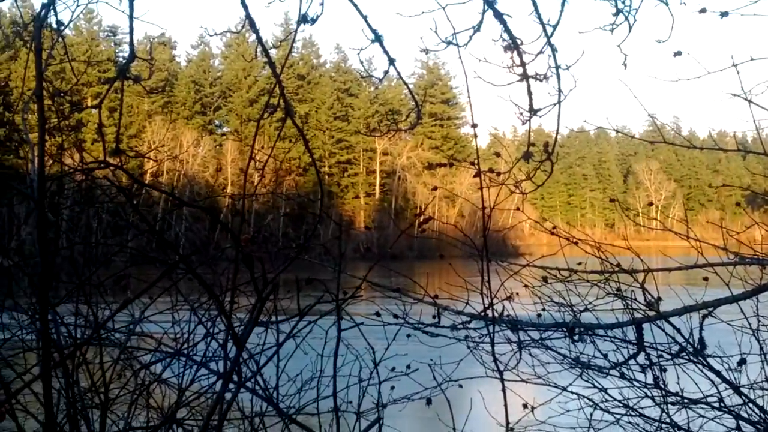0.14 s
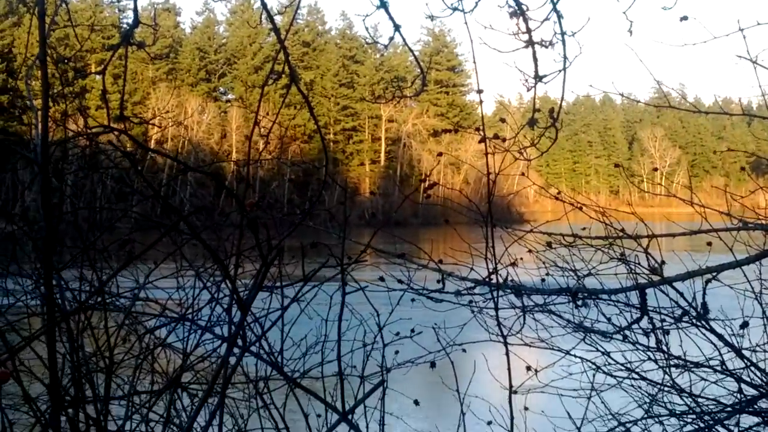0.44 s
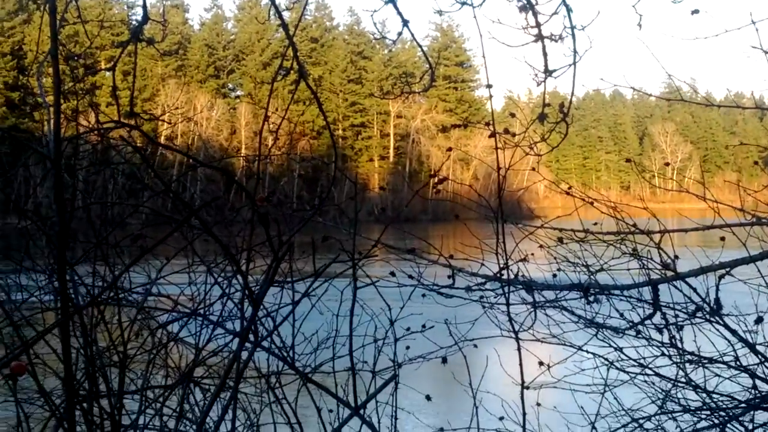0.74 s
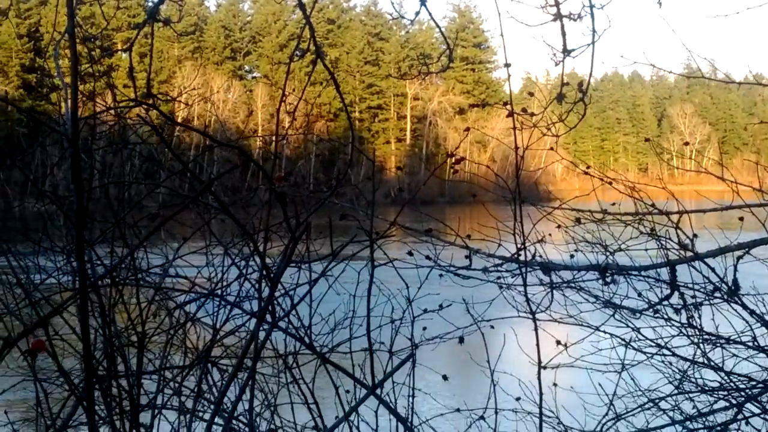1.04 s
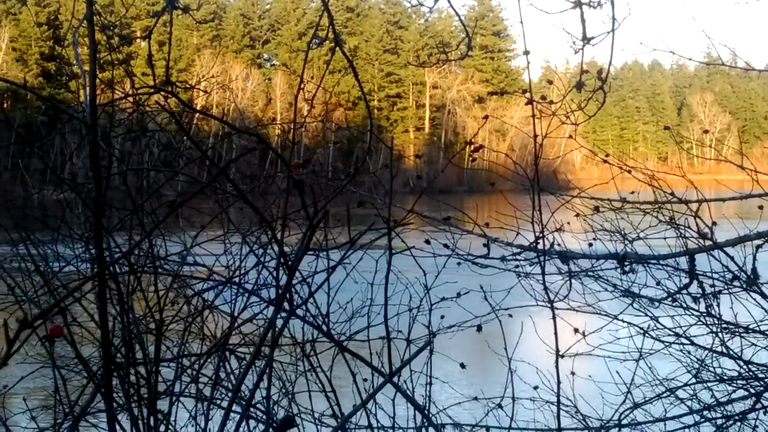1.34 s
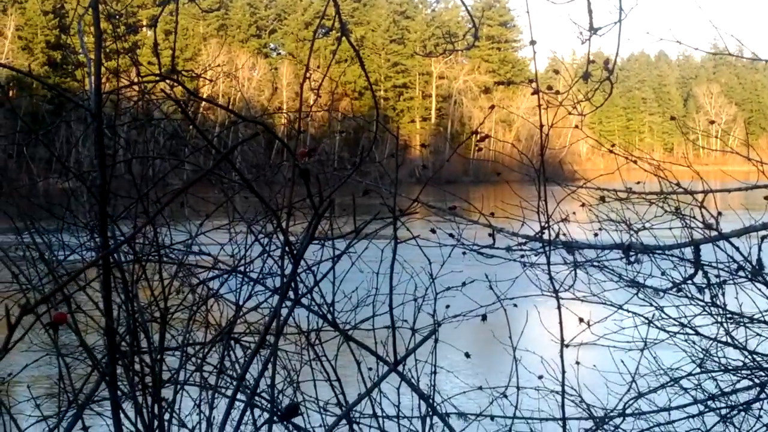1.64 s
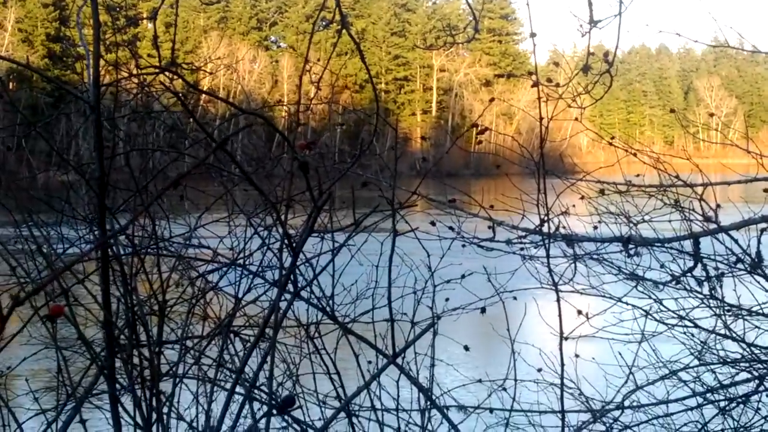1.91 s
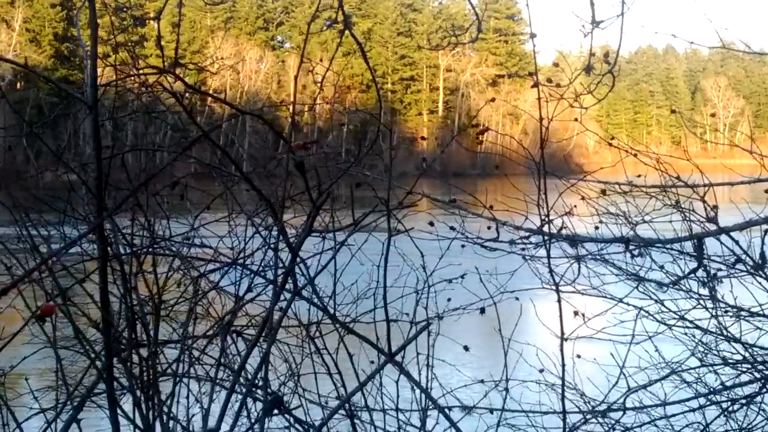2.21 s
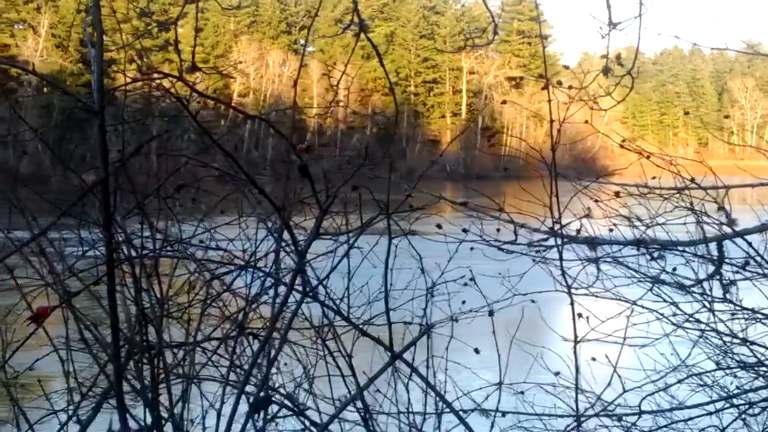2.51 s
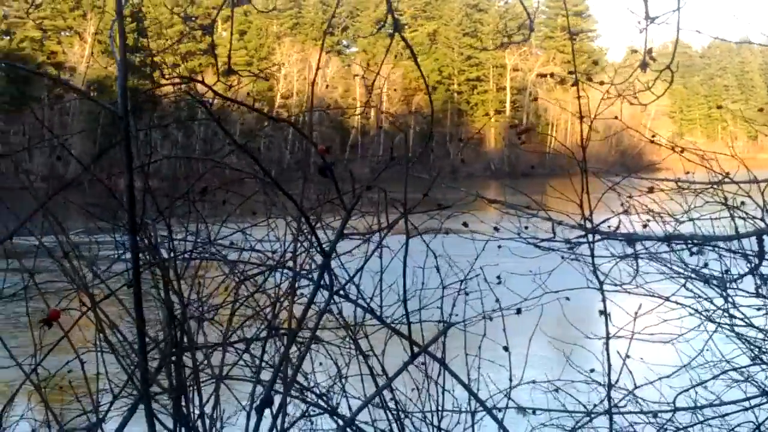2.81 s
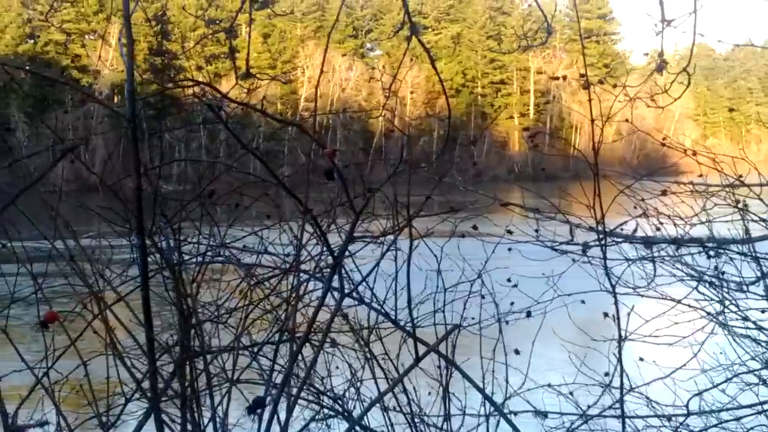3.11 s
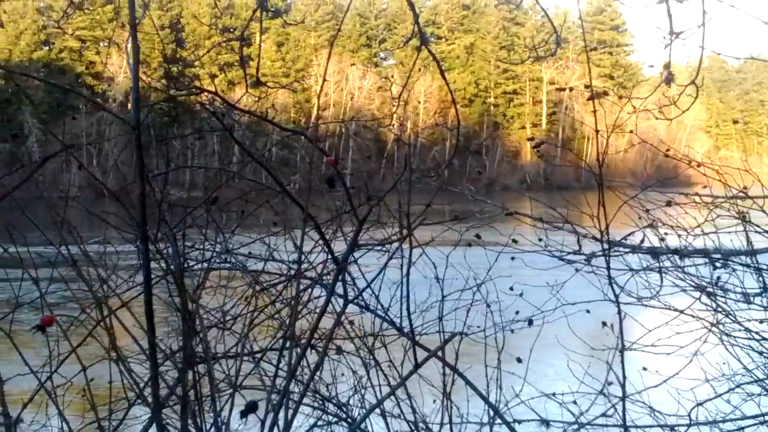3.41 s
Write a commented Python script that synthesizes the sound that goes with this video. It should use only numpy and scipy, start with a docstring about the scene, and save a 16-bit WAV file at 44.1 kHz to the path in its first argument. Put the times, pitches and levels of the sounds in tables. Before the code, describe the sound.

From the near bank, outdoors, thrown stones hit lake ice with sharp pew-like zips and knocks, then bounce away in ever closer, duller chirps, ending in a faint steady twitter over quiet rumble and hiss.

```python
"""On a frozen lake, rocks skip away across the ice. Each touch sends out a dispersive bending wave, treble first,
synthesized as a falling chirp that ends about when the airborne knock arrives. Farther touches give longer, duller
and closer chirps, until the rocks slide in a twitter. Filtered noise makes knocks, grit, ticks and a narrow ring;
the bank and wooded shore echo by convolution. A faint far rumble, a wavering hum and a thin hiss lie beneath."""
import sys
import numpy as np
from scipy import signal
from scipy.fft import rfft, irfft
from scipy.io import wavfile

SR = 44100
rng = np.random.default_rng(int(sys.argv[2]) if len(sys.argv) > 2 else 0)


def to_wav(sig):
    """Store sig (one row per channel, or 1-D mono) as 16-bit WAV at the path in sys.argv[1].

    Samples outside -1..1 are clipped; the rate is SR.
    """
    pcm = np.clip(np.atleast_2d(sig), -1, 1) * 32767
    pcm = np.round(pcm).astype(np.int16)
    wavfile.write(sys.argv[1], SR, pcm.T)  # frames by channels


N = 156555
T = np.arange(N) / SR  # time [s]

# Touches on the ice: (start [s], length [s], final pitch [Hz], level before ice colour [dB],
# early treble relative to the end [dB])
TOUCHES = [(0.2083, 0.023, 2376, -22, -1), (0.2987, 0.022, 2480, -23, -2.5), (0.548, 0.024, 2449, -27, -1),
           (0.6160, 0.028, 2293, -20.5, -6.5), (0.7815, 0.027, 2350, -18.5, -3),
           (0.93, 0.028, 2312, -28.5, -12), (0.993, 0.029, 2300, -34, -7), (1.0020, 0.028, 2290, -32, -3.5),
           (1.0452, 0.031, 2172, -25, -12), (1.061, 0.034, 2174, -32, -8.5), (1.1643, 0.03, 2273, -26, -10),
           (1.22, 0.034, 2150, -33, -10), (1.2627, 0.030, 2264, -28.5, -11.5),
           (1.3786, 0.035, 2112, -29, -2.5), (1.3810, 0.035, 2123, -35, -1),
           (1.4236, 0.031, 2260, -37.5, -6), (1.4322, 0.030, 2240, -28.5, -4),
           (1.541, 0.035, 2116, -30.5, -5), (1.5804, 0.032, 2220, -26.5, -7),
           (1.6164, 0.034, 2100, -36, -4), (1.698, 0.031, 2214, -27.5, -6), (1.7589, 0.04, 2122, -25, -5),
           (1.7778, 0.033, 2150, -28, -8), (1.9197, 0.036, 2104, -30.5, -6.5),
           (1.932, 0.039, 2084, -34.5, -3), (1.983, 0.032, 2140, -37.5, -8.5),
           (2.015, 0.033, 2190, -37, -10.5), (2.057, 0.036, 2107, -45, -13.5),
           (2.11, 0.036, 2093, -39.5, -11.5), (2.146, 0.037, 2090, -32.5, -11.5),
           (2.1894, 0.038, 2060, -40.5, -15), (2.241, 0.031, 2190, -42.5, -17),
           (2.278, 0.036, 2106, -42, -13.5), (2.292, 0.042, 2043, -35.5, -13.5),
           (2.33, 0.035, 2060, -43, -18), (2.4140, 0.035, 2170, -34.5, -10),
           (2.4466, 0.039, 2040, -35, -12), (2.4665, 0.046, 2050, -39, -12),
           (2.5594, 0.042, 1982, -39, -10), (2.569, 0.037, 2137, -39, -10),
           (2.5904, 0.039, 2130, -39.5, -13), (2.604, 0.039, 2140, -38.5, -14),
           (2.6286, 0.043, 2020, -37, -11), (2.669, 0.042, 2015, -40.5, -14),
           (2.706, 0.037, 2060, -44, -12), (2.72, 0.043, 2010, -38, -6), (2.7828, 0.047, 1955, -39, -8),
           (2.8014, 0.045, 2024, -36.5, -16), (2.861, 0.04, 2027, -40, -8),
           (2.917, 0.043, 2030, -41.5, -15), (2.932, 0.043, 2022, -34, -8.5),
           (2.9674, 0.039, 2120, -38, -8), (2.978, 0.043, 2000, -35.5, -11),
           (3.0127, 0.038, 2080, -37, -14), (3.0234, 0.04, 2007, -43.5, -16),
           (3.059, 0.038, 2130, -40.5, -11), (3.0713, 0.047, 1996, -40, -15),
           (3.1198, 0.045, 2000, -39.5, -10), (3.1625, 0.04, 2130, -40, -16),
           (3.206, 0.043, 2000, -37.5, -15), (3.2176, 0.044, 2000, -38.5, -8.5),
           (3.2393, 0.041, 1995, -40, -17), (3.286, 0.045, 1984, -34, -8.5),
           (3.317, 0.045, 2035, -42.5, -12), (3.404, 0.037, 2000, -43.5, -11.5),
           (3.4358, 0.044, 1984, -37, -13.5), (3.522, 0.042, 2050, -38.5, -16)]
# Short, high zips around the nearest touches: (start [s], length [s], final pitch [Hz], level [dB])
HIGH_ZIPS = [(0.200, 0.0054, 5200, -44), (0.259, 0.007, 3680, -32), (0.29, 0.0069, 4960, -38),
             (0.2965, 0.0078, 4500, -21.5), (0.502, 0.0096, 3730, -45.5), (0.540, 0.005, 5150, -50),
             (0.548, 0.0078, 4210, -29.5), (.607, 0.0047, 5300, -45)]


def skips():
    """Dispersion: each clear bounce spreads into a falling chirp, with brief higher zips beside the nearest."""
    out = np.zeros(N)
    for start, length, end_hz, level_db, treble_db in TOUCHES:
        add(out, start, chirp(length, end_hz, level_db, treble_db))
    for start, length, end_hz, level_db in HIGH_ZIPS:
        wave, _, progress = bending_wave(length, end_hz)
        swell = np.sin(np.pi / 2 * progress) ** 2
        add(out, start, from_db(level_db) * wave * swell)
    return out


SLIDE_PER_S, SLIDE_LENGTH_S = 62, .042
SLIDE_END_HZ, SLIDE_PITCH_SPREAD = 2020, 0.02093  # the spread is a fraction of the pitch
SLIDE_TREBLE_DB, SLIDE_SPREAD_DB = -8, 1.5
# Light touches while sliding, levels before ice colour: (time [s], level [dB])
SLIDE_LEVELS = [(1.9, -51.5), (2.1, -52), (2.329, -49.5), (2.53, -51), (2.6, -46.5), (3.0, -49),
                (3.3, -49.5), (3.55, -57.5)]


def slide():
    """Repeated impact: far out the rocks rattle along in many light touches at jittered intervals."""
    out = np.zeros(N)
    times, levels = np.transpose(SLIDE_LEVELS)
    for beat in np.arange(times[0], T[-1], 1 / SLIDE_PER_S):
        start = beat + rng.uniform(-0.6, 0.6) / SLIDE_PER_S
        level_db = np.interp(start, times, levels) + SLIDE_SPREAD_DB * rng.standard_normal()
        end_hz = SLIDE_END_HZ * (1 + SLIDE_PITCH_SPREAD * rng.standard_normal())
        add(out, start, chirp(SLIDE_LENGTH_S, end_hz, level_db, SLIDE_TREBLE_DB))
    return out


NEAR_LENGTH_S, NEAR_TOP_HZ, TOP_FALL = 0.03, 5980, 0.54  # longer paths lose their top
SIDE_PATH_DB, SIDE_PATH_S = -23, 0.008  # level at the near length; longest extra delay
SIDE_PATH_DB_PER_S = 350  # side paths gain on the direct wave as the chirps lengthen
ONSET_FADE_S = 0.003  # time constant: the earliest, highest cycles swell in softly
# Response of the ice along the sweep: (frequency [Hz], gain [dB])
ICE_RESPONSE = [(1500, -2.5), (2100, -3), (2450, -2.5), (2680, -2), (2860, -7.5), (3050, -1.5), (3400, -1),
                (4200, -7.5), (5200, -15), (6500, -18), (9000, -34)]


def chirp(length, end_hz, level_db, treble_db, count=4):
    """Absorption and multipath: a longer path dulls the chirp's start and strengthens its delayed copies."""
    wave, hz, progress = bending_wave(length, end_hz)
    early_db = treble_db * np.interp(progress, [.3, .7], [1, 0])
    wave = wave * from_db(level_db + at_hz(ICE_RESPONSE, hz) + early_db)
    top_hz = NEAR_TOP_HZ * (length / NEAR_LENGTH_S) ** -TOP_FALL
    wave = wave / np.sqrt(1 + (hz / top_hz) ** 20)
    wave = wave * (1 - np.exp(-progress * length / ONSET_FADE_S))
    span = int(SIDE_PATH_S * SR)
    out = np.pad(wave, (0, span))
    side_gain = from_db(SIDE_PATH_DB + SIDE_PATH_DB_PER_S * (length - NEAR_LENGTH_S))
    for lag in (rng.random(count) * span).astype(int):
        out[lag:lag + len(wave)] += side_gain * wave
    return out


SWEEP_POWER, TOP_HZ = .39, 8450  # fall of pitch with time; 6 dB treble roll-off point
DROP_S, DROP_FADE_S = 0.0013, 0.00044  # time constants: the end sags into a short low click
RIPPLE_DB, RIPPLE_S = 1.5, 0.0022  # uneven ice makes each chirp flutter
ONSET_RIPPLE_DB = 2  # added flutter at its weak start


def bending_wave(length, end_hz):
    """Dispersion: high frequencies travel fastest, so pitch falls as a power of time. Also gives pitch, progress 0-1."""
    t = T[1:int((length + .01) * SR)]
    progress = np.minimum(t / length, 1)
    after = np.maximum(t - length, 0)
    hz = np.minimum(end_hz * progress ** -SWEEP_POWER, 2 * TOP_HZ) * np.exp(-after / DROP_S)
    flutter_db = (RIPPLE_DB + ONSET_RIPPLE_DB * (1 - progress)) * wander(t, RIPPLE_S)
    gain = from_db(flutter_db) * np.exp(-after / DROP_FADE_S) / (1 + (hz / TOP_HZ) ** 6)
    return np.sqrt(2) * gain * np.sin(2 * np.pi * np.cumsum(hz) / SR), hz, progress


CLICK_T60_S, THUD_T60_S, SCATTER_T60_S = 0.01, 0.027, 0.41
GRAINS_PER_S = 3000  # crackle of grit and of sound scattered by twigs
# Airborne knocks of stone on ice: (time [s], click level [dB], low thud level [dB], scattered tail level [dB])
AIR_KNOCKS = [(0.2303, -28, -30, -38), (0.3207, -25, -26, -37.5), (0.5726, -32.5, -36, -48.5),
              (0.6427, -20.5, -38, -38)]
# Spectra of click, thud and scattered tail: (frequency [Hz], relative level [dB])
CLICK_SPECTRUM = [(500, -0.5), (1500, -1), (3000, 6.5), (5000, -19), (8000, -2.5), (12000, -9), (16000, -6)]
THUD_SPECTRUM = [(60, -19), (250, -3), (500, -8), (900, 4.5), (1400, -8.5), (3000, -33)]
SCATTER_SPECTRUM = [(300, -0.5), (1500, -7), (2600, 7.5), (4800, -3), (7000, -12.5), (11000, -8.5),
                    (16000, -14)]


def knocks():
    """Airborne radiation and scattering: the nearest touches click and thud, then crackle back from the bank."""
    times, click_db, thud_db, tail_db = np.transpose(AIR_KNOCKS)
    click = bursts(times, click_db, noise(CLICK_SPECTRUM), CLICK_T60_S)
    thud = bursts(times, thud_db, noise(THUD_SPECTRUM), THUD_T60_S)
    tail = bursts(times, tail_db, grains(SCATTER_SPECTRUM, GRAINS_PER_S), SCATTER_T60_S)
    return click + thud + tail


RING_T60_S = 0.1
# Rings of the ice sheet after the first bounce: (time [s], level [dB])
RING_TIMES = [(.232, -42), (.270, -37)]
# Narrow band of the ring: (frequency [Hz], relative level [dB])
RING_SPECTRUM = [(2000, -50), (2380, -11), (2480, 5), (2580, -15), (3000, -50)]


def ringing():
    """Resonance: the ice sheet rings in a narrow band that decays exponentially."""
    return bursts(*np.transpose(RING_TIMES), noise(RING_SPECTRUM), RING_T60_S)


SPRAY_T60_S = 0.45
# Gritty spray as the first stones land: (time [s], level [dB])
SPRAY_TIMES = [(.201, -46), (0.296, -41.5), (0.542, -48), (.606, -51)]
# Colour of the spray: (frequency [Hz], relative level [dB])
SPRAY_SPECTRUM = [(1800, -7.5), (3000, -7), (5300, 2), (8000, -8.5), (12000, -15), (16000, -14)]


def spray():
    """Granular noise: dense random clicks of grit, dying away after each landing."""
    return bursts(*np.transpose(SPRAY_TIMES), grains(SPRAY_SPECTRUM, GRAINS_PER_S), SPRAY_T60_S)


TICK_T60_S = 0.022
# Small dry ticks: (time [s], level [dB])
TICK_TIMES = [(0.12, -33), (0.123, -46), (.127, -50), (.266, -41), (.768, -47), (1.354, -50), (2.347, -48),
              (3.347, -53), (3.354, -49)]
# Colour of the ticks: (frequency [Hz], relative level [dB])
TICK_SPECTRUM = [(1500, -16), (4000, -19), (9000, -16), (13000, -6.5), (16000, -1)]


def ticks():
    """Transient excitation: short bursts of bright noise."""
    return bursts(*np.transpose(TICK_TIMES), noise(TICK_SPECTRUM), TICK_T60_S)


BANK_DB, BANK_T60_S, BANK_ECHOES_PER_S = -12, 0.33, 450
SHORE_DB, SHORE_T60_S = -15, 0.81
# Colour of both echoes: (frequency [Hz], relative level [dB])
ECHO_SPECTRUM = [(500, 13), (1400, 8.5), (1900, 5.5), (2500, -1), (3300, 3.5), (4600, 8), (7000, 3.5),
                 (9000, -8), (16000, -24)]


def echoes(x):
    """Reverberation: convolution with separate near-bank reflections and a long wash from the wooded shore."""
    bank = grains(ECHO_SPECTRUM, BANK_ECHOES_PER_S)
    shore = noise(ECHO_SPECTRUM)
    response = 0
    for level_db, t60, texture in ((BANK_DB, BANK_T60_S, bank), (SHORE_DB, SHORE_T60_S, shore)):
        tail = texture * from_db(-60 * T / t60)
        response = response + from_db(level_db) * tail / np.sqrt(np.sum(tail ** 2))  # unit energy, then level
    return signal.fftconvolve(x, response)[:N]


RUMBLE_DB, RUMBLE_EDGE_HZ = -49.5, 1420
# Colour of the rumble before its low-pass: (frequency [Hz], relative level [dB])
RUMBLE_SPECTRUM = [(15, -56), (25, -3), (64, 1), (97, -0.5), (119, -18.5), (132, -2.5), (156, -11.5),
                   (189, -11), (266, -6), (408, -11.5), (546, -10.5), (882, -2.5), (1500, -15.5),
                   (1950, -9), (3300, -120)]


def rumble():
    """Low-pass filtering: steady coloured noise keeps only its low part, a faint far rumble."""
    low_pass = signal.butter(6, RUMBLE_EDGE_HZ, fs=SR, output="sos")
    return from_db(RUMBLE_DB) * rms_one(signal.sosfilt(low_pass, noise(RUMBLE_SPECTRUM)))


HUM_HZ, HUM_WAVER_HZ = 122.1, 2.99
HUM_DB, HUM_WAVER_DB, HUM_FADE_DB_PER_S = -56, 2.1, 1.97  # level at the start, its waver and its fade


def hum():
    """Frequency and amplitude modulation: a low sine wavers in pitch and level as it slowly fades."""
    hz = HUM_HZ + HUM_WAVER_HZ * wander(T, .07)
    tone = np.sqrt(2) * np.sin(2 * np.pi * np.cumsum(hz) / SR)
    return from_db(HUM_DB - HUM_FADE_DB_PER_S * T + HUM_WAVER_DB * wander(T, .09)) * tone


HISS_DB = -59
# Colour of the hiss: (frequency [Hz], relative level [dB])
HISS_SPECTRUM = [(1200, 6), (2000, -4.5), (4000, 0.5), (7000, -4), (10000, -7.5), (12000, -2), (13000, 0),
                 (13550, 12.5), (14100, -2), (16000, 3)]


def hiss():
    """Stationary noise: a thin, steady coloured hiss."""
    return from_db(HISS_DB) * noise(HISS_SPECTRUM)


def bursts(times, levels_db, texture, t60):
    """Exponential decay: a texture starts sharply at each time and falls 60 dB per t60, for up to a second."""
    envelope = np.zeros(N)
    for start, level_db in zip(times, levels_db):
        add(envelope, start, from_db(level_db - 60 * T[:SR] / t60))
    return envelope * texture


GRAIN_SPREAD_DB = 2.5


def grains(spectrum, per_s):
    """Shot noise: random clicks of uneven size and either sign, coloured, rms 1."""
    present = rng.random(N) < per_s / SR
    sign = rng.choice([-1, 1], N)
    size = from_db(GRAIN_SPREAD_DB * np.minimum(rng.exponential(1, N), 3))
    return coloured(present * sign * size, spectrum)


def noise(spectrum):
    """Filtered Gaussian noise: coloured, rms 1."""
    return coloured(rng.standard_normal(N), spectrum)


def coloured(x, spectrum):
    """Linear filtering: multiply the Fourier spectrum by a colour, then set rms 1."""
    gain = from_db(at_hz(spectrum, np.fft.rfftfreq(N, 1 / SR)))
    return rms_one(irfft(rfft(x) * gain, N))


def at_hz(points, hz):
    """Interpolation: read a spectrum in dB on a log-frequency axis."""
    f, db = np.transpose(points)
    return np.interp(np.log(hz + 1e-3), np.log(f), db)


def wander(t, step_s, count=64):
    """Random modulation: normal values joined by lines, one every step."""
    return np.interp(t / step_s, np.arange(count), rng.standard_normal(count))


def from_db(db):
    """Decibel law: amplitude ratio of a level."""
    return 10 ** (np.asarray(db) / 20)


def rms_one(x):
    """Power normalisation: scale to rms 1."""
    return x / np.sqrt(np.mean(x ** 2) + 1e-20)


def add(out, start, sound):
    """Superposition: mix a sound in at a time in seconds."""
    i = int(np.clip(start * SR, 0, N))
    out[i:i + len(sound)] += sound[:N - i]


def scene():
    """Superposition: the singing ice with its echoes, over the quiet of the lake."""
    ice = skips() + slide()
    near = ringing() + knocks() + spray() + ticks()
    background = rumble() + hum() + hiss()
    return (ice + echoes(ice) + near + background)[None]


def record(dry):
    """Band limiting: a steep low-pass puts everything above 16.3 kHz at least 60 dB down."""
    return signal.sosfilt(signal.cheby2(16, 60, 16300, fs=SR, output="sos"), dry)


dry = scene()
out = record(dry)
to_wav(out)
```